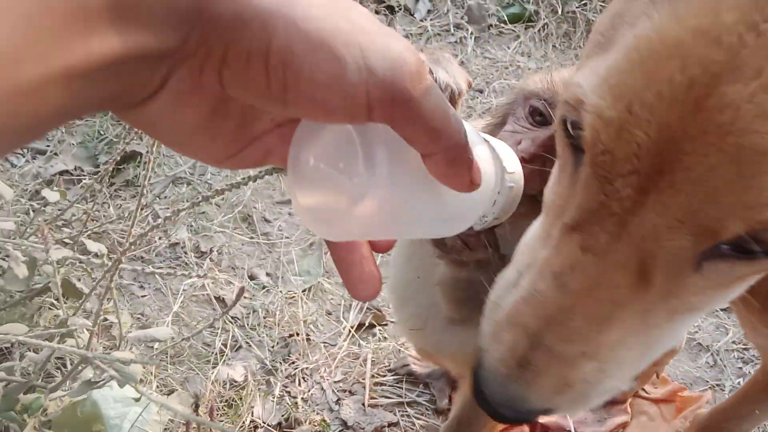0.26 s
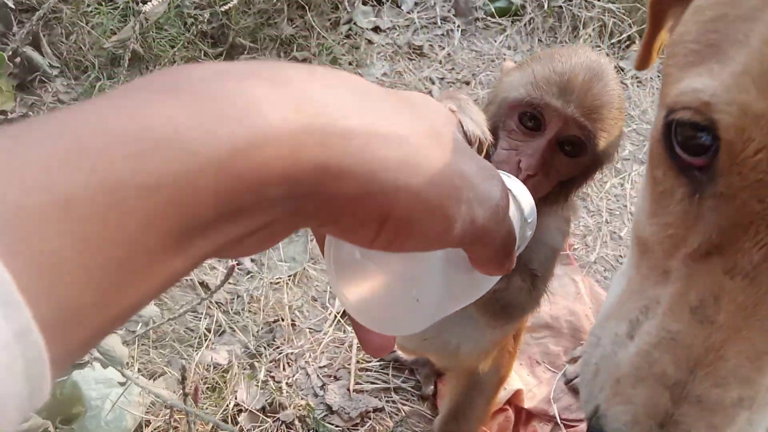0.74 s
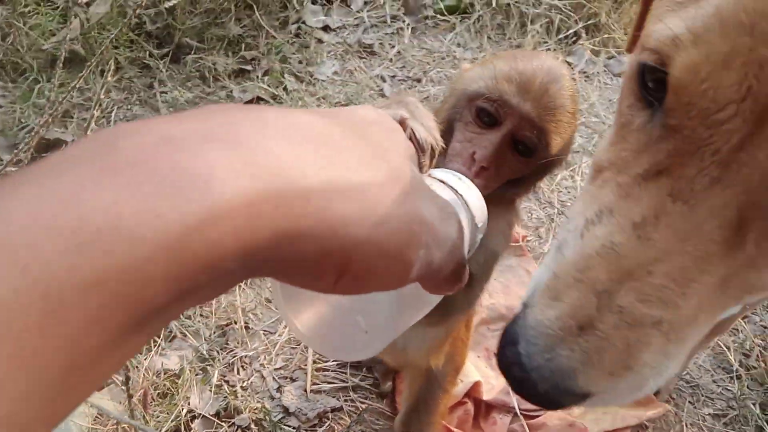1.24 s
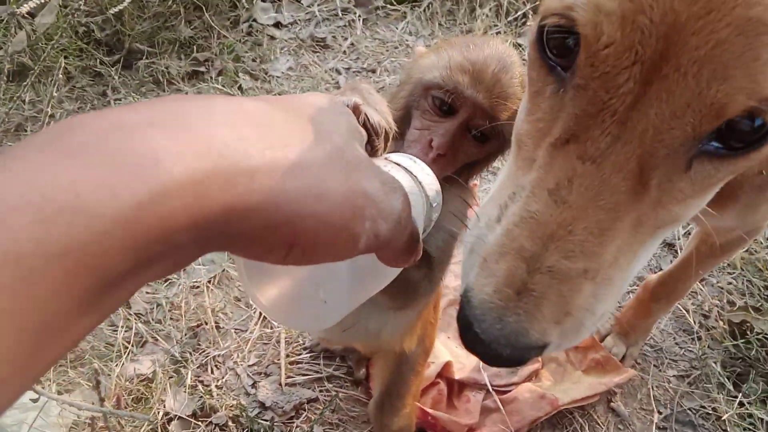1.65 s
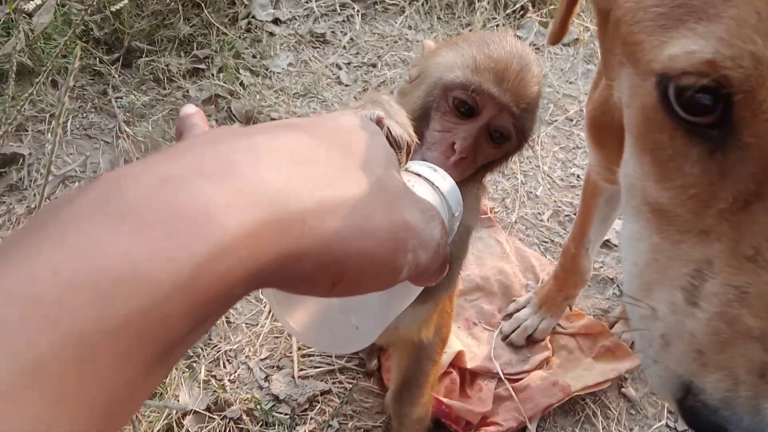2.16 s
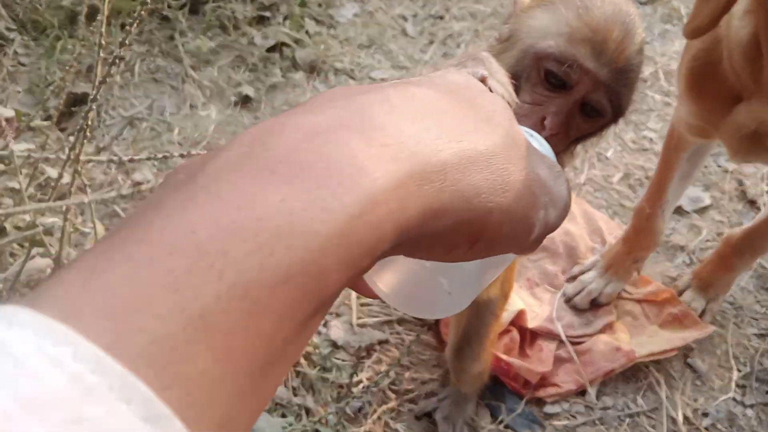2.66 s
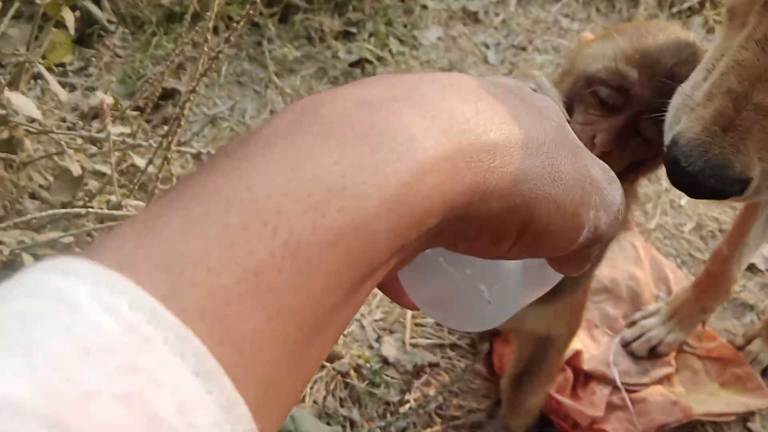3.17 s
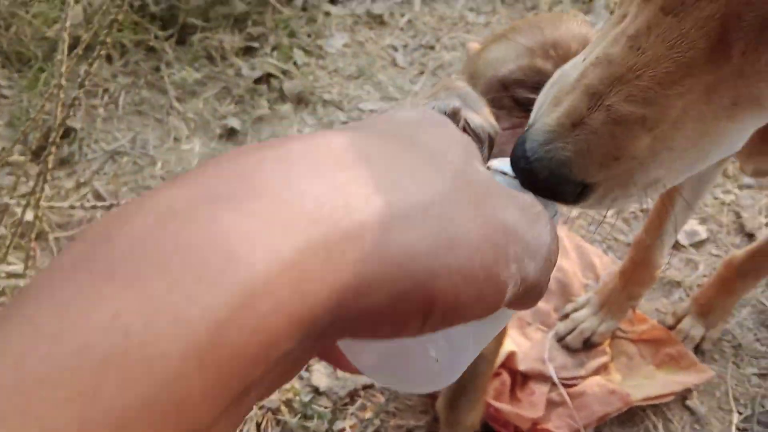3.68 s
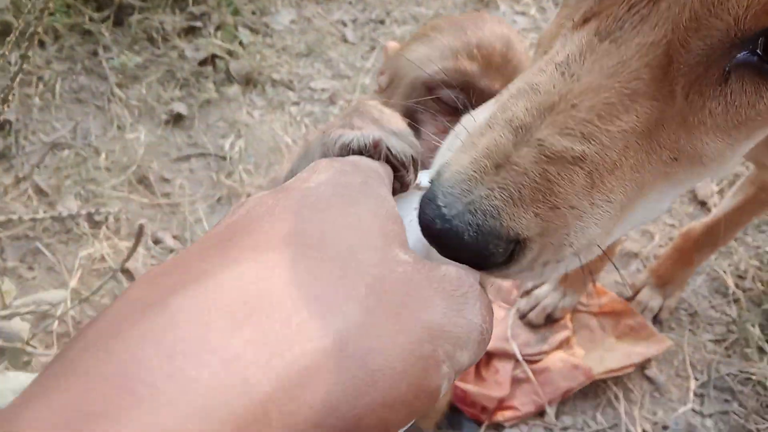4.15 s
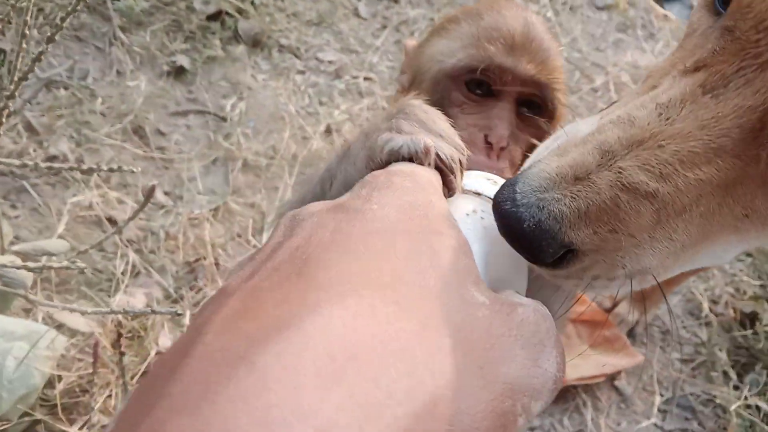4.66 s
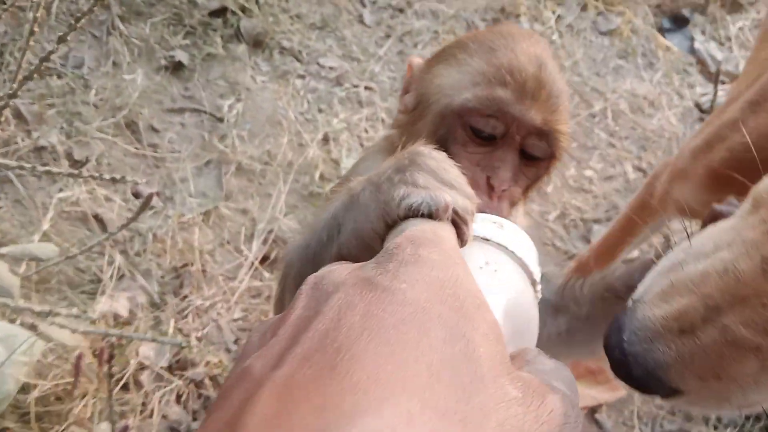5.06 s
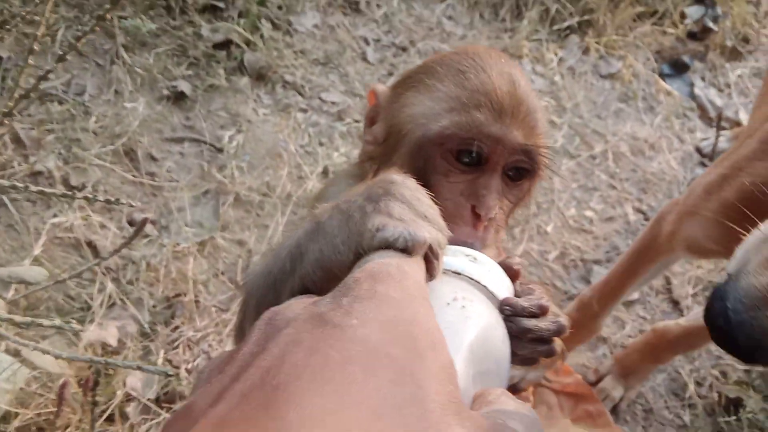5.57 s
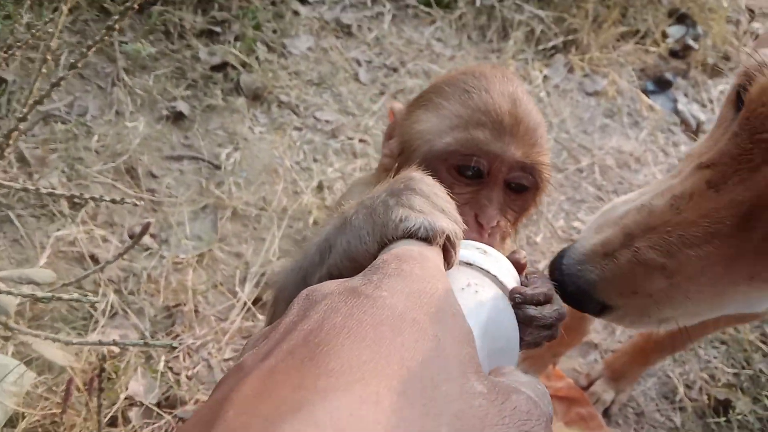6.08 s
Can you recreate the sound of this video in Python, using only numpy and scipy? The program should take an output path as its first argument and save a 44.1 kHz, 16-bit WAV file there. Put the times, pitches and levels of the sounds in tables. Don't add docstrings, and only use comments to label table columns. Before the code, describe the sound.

Busy bird flock in dry open country, mono and slightly thin as on a phone. Rough chirps lead, thinning briefly around a loud caw; clear whistles follow in the middle, then dense calls, a bright high whistle, a fast trill and closing caws. Behind them lie distant chatter, a wavering hoarse note and a low breeze. Small plastic knocks, dry ticks and faint leaf rustles sit close.

```python
import sys
import numpy as np
from scipy import signal
from scipy.fft import rfft, irfft, next_fast_len
from scipy.io import wavfile

SR = 44100
rng = np.random.default_rng(int(sys.argv[2]) if len(sys.argv) > 2 else 0)


def makeup_ratio(level_db):
    decades = np.asarray(level_db, float) / 20
    return 10 ** decades


def wrap_up_sound(samples):
    columns = np.atleast_2d(samples).T
    tamed = np.clip(columns, -1, 1)
    steps = np.round(tamed * 32767).astype(np.int16)
    wavfile.write(sys.argv[1], SR, steps)


N = 278698


def rms_one(x):
    return x / np.sqrt(np.mean(np.abs(x) ** 2) + 1e-20)


def add(out, start, x):
    out[start:start + len(x)] += x[:N - start]


def band(x, low_hz, high_hz, order=2):
    sos = signal.butter(order, [low_hz, high_hz], "band", fs=SR, output="sos")
    return signal.sosfilt(sos, x)


def drift(rate):
    knots_per_s = 40
    knots = rng.standard_normal(int(N / SR * knots_per_s) + 4)
    slow = rms_one(signal.lfilter([1], [1, -np.exp(-rate / 20)], knots))
    return np.interp(np.arange(N) / SR * knots_per_s, np.arange(len(slow)), slow)


def in_time(rows, fade_s=.009):
    s, *columns = np.transpose(rows)
    start = max(round(s[0] * SR), 0)
    t = np.arange(start, min(round(s[-1] * SR), N)) / SR
    fade_in = t - s[0] + (s[0] < .005)
    fade_out = s[-1] - t + (s[-1] > 6.3)
    gate = np.clip(np.minimum(fade_in, fade_out) / fade_s, 0, 1)
    return start, gate, [np.interp(t, s, c) for c in columns]


def call(s, length_s, from_hz, to_hz, db, peak, rise_db, fall_db):
    peak = np.clip(peak, .05, .95)
    peak_hz = from_hz + peak * (to_hz - from_hz)
    return in_time([(s, from_hz, db - rise_db, 0),
                    (s + peak * length_s, peak_hz, db, peak),
                    (s + length_s, to_hz, db - fall_db, 1)])


def syrinx(hz, partials, rasp_hz, rough, throb, wobble=0.0098, flutter=0):
    luck = rng.standard_normal((len(partials) + 1, 2, 600))
    knots, t = np.arange(600), np.arange(len(hz)) / SR
    uneven = np.interp(t * 150, knots, luck[-1, 0])
    waver = np.interp(t * 60, knots, luck[-1, 1])
    turns = np.cumsum(hz * (1 + wobble * waver)) / SR
    cycles = np.cumsum(rasp_hz * np.exp(0.22 * uneven)) / SR
    turns = turns + flutter * np.sin(2 * np.pi * cycles) / (2 * np.pi)
    pulse = 1 + np.clip(throb, 0, 1) * np.cos(2 * np.pi * cycles)
    out = 0
    for k, ((multiple, db), (a, b)) in enumerate(zip(partials, luck)):
        share = np.clip(rough + 0.22 * k, 0, 1)
        chance = np.interp(cycles * (1 + .2 * k), knots, a + 1j * b)
        chance = chance / (1 + .4 * np.abs(chance))
        steady_and_rough = np.sqrt(1 - share) + np.sqrt(share) * rms_one(chance)
        tone = rms_one(pulse * steady_and_rough)
        out = out + makeup_ratio(db) * np.sqrt(2) * np.real(tone * np.exp(2j * np.pi * multiple * turns))
    return out


# (pitch [Hz], level per Hz [dB])
AIR_COLOUR = [(25, -36), (62, 3), (120, 0), (330, -3.5), (520, -10), (1000, -7.5), (1800, -4.5),
              (3000, -10), (5000, -20.5), (7200, -19), (9000, -38), (13800, -34), (15000, -26.5),
              (15700, -22.5)]
# (time [s], level [dB])
BREEZE = [(0.0, -73), (0.54, -75), (1.21, -71), (1.71, -71), (1.92, -73), (2.38, -72), (2.76, -74),
          (4.43, -72), (5.61, -74), (5.76, -77), (6.09, -73), (6.32, -73)]


def air():
    size = next_fast_len(N)
    hz = np.fft.rfftfreq(size, 1 / SR) + 1
    colour_hz, colour_db = np.transpose(AIR_COLOUR)
    colour = makeup_ratio(np.interp(np.log(hz), np.log(colour_hz), colour_db))
    hush = rfft(rng.standard_normal(size)) * colour
    edges, gust = [0, *np.geomspace(60, 1100, 14), SR], drift(5)
    bands = [irfft(hush * ((hz > low) & (hz <= high)), size)[:N] for low, high in zip(edges, edges[1:])]
    lumpy = sum(b * makeup_ratio(4.7 * drift(18.4) + 1.6 * gust) for b in bands[:-1])
    breeze_db = np.interp(np.arange(N) / SR, *np.transpose(BREEZE))
    lumpy = lumpy * makeup_ratio(breeze_db - breeze_db.mean())
    smooth = bands[-1] * makeup_ratio(1.1 * gust)
    return makeup_ratio(-66.5) * rms_one(lumpy + smooth)


# (time [s], pitch [Hz], level [dB])
DRONE = [(0.0, 1263, -65.5), (0.49, 1273, -62.5), (0.53, 1263, -86), (0.7, 1233, -62.5),
         (1.49, 1254, -76.5), (1.74, 1298, -66.5), (2.11, 1269, -84), (2.18, 1296, -55.5),
         (2.48, 1275, -77), (3.61, 1238, -67), (3.62, 1259, -60.5), (4.96, 1291, -61.5),
         (5.09, 1267, -72.5), (6.14, 1250, -63), (6.32, 1248, -69)]
# (time [s], length [s], pitch [Hz], level [dB])
COOS = [
    (0.093, 0.62, 683, -75.5),
    (1.8, 0.44, 888, -73),
    (2.107, 0.72, 654, -76.5),
    (4.25, 1.02, 304.6, -75.5),
    (4.762, 0.21, 665, -77),
    (5.145, 0.2, 795, -71),
    (2.6, 0.19, 1064, -70),
    (3.75, 1.5, 1470, -69),
    (3.75, .08, 1650, -66),
]


def drone():
    out = np.zeros(N)
    _, _, (hz, db) = in_time(DRONE)
    white = rng.standard_normal((2, N))
    blur = signal.sosfilt(signal.butter(2, 40, fs=SR, output="sos"), white[0] + 1j * white[1])
    note = np.real(blur[:len(hz)] * np.exp(2j * np.pi * np.cumsum(hz) / SR))
    add(out, 0, makeup_ratio(db) * rms_one(note))
    for s, length_s, hz, db in COOS:
        swell = np.sqrt(np.hanning(round(length_s * SR)))
        coo = syrinx(hz + 0 * swell, [(1, db)], rasp_hz=25, rough=1.0, throb=0)
        add(out, round(s * SR), swell * coo)
    return out


# (time [s], chatter level [dB], lean to the high voices [dB per octave])
FLOCK = [(0.0, -67.5, 0), (.4, -63, -1.5), (.58, -53.5, 2), (.9, -65.5, -3), (1.1, -53.5, -4.5),
         (1.41, -72.5, 8.5), (2.159, -76.5, -2.5), (2.5, -83, 3.5), (2.801, -65, 10.5), (3.3, -69.5, -5),
         (3.48, -72.5, -2.5), (3.7, -71.5, -5), (4.12, -64.5, -2), (4.5, -64.5, 5), (4.66, -69, -10.5),
         (5.25, -64, -3), (5.77, -55, -2), (6.09, -63, 0.5)]
# (pitch [Hz], level [dB])
FLOCK_TILT = [(1500, -7), (2000, -0.5), (3000, 7.5), (4500, 2.5), (6200, -0.5), (7300, -3.5), (8500, -6.5),
              (11000, -13.5)]
# (time [s], length [s], middle pitch [Hz], peak level [dB])
SURGES = [(0.018, 0.37, 4030, -50), (.631, 0.083, 5510, -63), (.741, 0.078, 3350, -50),
          (1.101, 0.23, 3330, -64), (1.847, 0.22, 4200, -61), (2.966, 0.37, 3880, -49.5),
          (4.953, 0.33, 3700, -57), (5.36, 0.43, 3830, -51.5), (5.851, 0.37, 3810, -54.5),
          (6.284, 0.25, 4280, -51.5), (1.4, .3, 5600, -68), (2.79, .12, 5600, -60), (1.411, .31, 7800, -78),
          (2.94, 0.29, 7710, -69), (4.101, .21, 7710, -80), (5.491, .26, 7710, -74),
          (6.251, 0.45, 7710, -60)]


def far_flock():
    middle_hz, top_hz, above_db_per_oct = 3700, 5764, -57
    surge_octaves = .35
    t = np.arange(0, N / SR + .01, .005)
    s, chatter_db, lean_db = np.transpose(FLOCK)
    chatter_db, lean_db = np.interp(t, s, chatter_db), np.interp(t, s, lean_db)
    out, white = np.zeros(N), rng.standard_normal((2, N))
    edges = np.geomspace(1450, 11000, 46)
    for k, (low_hz, high_hz) in enumerate(zip(edges, edges[1:])):
        octaves = np.log2(np.clip(low_hz, 2400, top_hz) / middle_hz)
        above_db = above_db_per_oct * max(np.log2(low_hz / top_hz), 0)
        power = makeup_ratio(chatter_db + lean_db * octaves + above_db) ** 2
        for s, length_s, hz, db in SURGES:
            off_pitch_db = 10 * abs(np.log2(low_hz / hz)) / surge_octaves
            power = power + makeup_ratio(db - 33 * ((t - s) / length_s) ** 2 - off_pitch_db) ** 2
        tilt_db = np.interp(low_hz, *np.transpose(FLOCK_TILT)) - 12.0
        gain = np.interp(np.arange(N) / SR, t, np.sqrt(power)) * makeup_ratio(tilt_db)
        voice = rms_one(band(white[k % 2], low_hz, high_hz))
        out += gain * voice * makeup_ratio(4.0 * drift(17) - 1.5)
    return out


# (time [s], length [s], peak level [dB])
RUSTLES = [
    (.43, .03, -84),
    (1.3, .1, -88),
    (1.44, .12, -86),
    (1.71, .05, -82),
    (2.28, .04, -84),
    (2.94, .05, -82),
    (4.09, .05, -83),
    (5.52, .15, -86),
]


def leaves():
    t = np.arange(N) / SR
    swell = sum(makeup_ratio(db - 33 * ((t - s) / length_s) ** 2) for s, length_s, db in RUSTLES)
    return swell * rms_one(band(rng.standard_normal(N), 8600, 15700))


# (time [s], peak level [dB], pitch [Hz], time to die by 60 dB [s], duller body re peak [dB])
TICKS = [(0.2029, -98, 7600, 0.018, 27), (0.317, -54.5, 7900, 0.028, -6), (0.4215, -70, 8600, 0.018, 12),
         (1.126, -69, 7600, 0.02, 9), (1.3653, -64, 7590, 0.015, -6), (1.816, -76, 7590, 0.02, 4),
         (1.9036, -79, 7650, 0.02, 6), (2.184, -69, 7610, 0.02, 8), (2.2796, -70, 7740, 0.017, 8),
         (2.7335, -74, 7400, 0.017, 15), (2.7538, -75, 7400, 0.017, 10), (2.8536, -62.5, 7750, 0.025, -4),
         (2.9349, -62, 8770, 0.019, -5), (3.0696, -95, 8130, 0.017, 19), (3.942, -60, 9100, 0.0076, -9),
         (4.0794, -69, 7700, 0.017, 8), (4.5463, -50, 10900, 0.028, -17), (5.5123, -53.5, 7490, 0.019, -1)]


def grass_ticks():
    out, t = np.zeros(N), np.arange(SR // 12) / SR
    for s, db, hz, t60, body_db in TICKS:
        burst = rng.standard_normal(len(t)) * makeup_ratio(-60 * t / t60)
        bright = band(burst, 0.83 * hz, min(1.13 * hz, 16000)) + .35 * band(burst, 14000, 15800)
        body = band(burst, 2500, 11000)
        tick = bright / abs(bright).max() + makeup_ratio(body_db) * body / abs(body).max()
        add(out, round(s * SR), makeup_ratio(db) * tick)
    return out


# (time [s], peak level [dB], pitch [Hz], time to die by 60 dB [s])
KNOCKS = [(0.067, -44.5, 1060, 0.016), (.88, -59, 443, 0.029), (0.97, -50.5, 464, 0.052),
          (1.137, -52.5, 1050, 0.049), (2.198, -43, 1140, 0.018), (2.221, -56, 316, 0.046),
          (2.755, -49.5, 210, 0.024), (3.325, -55, 801, 0.045), (3.85, -64, 815, 0.21),
          (3.978, -42.5, 850, 0.026), (4.344, -51, 380, 0.048), (4.515, -41.5, 1110, 0.027),
          (4.787, -53, 420, 0.028), (5.511, -47.5, 810, 0.0086), (5.69, -47.5, 1100, 0.043)]


def bottle_knocks():
    out, t = np.zeros(N), np.arange(SR // 12) / SR
    for s, db, hz, t60 in KNOCKS:
        attack = np.minimum(t / 0.00085, 1)
        add(out, round(s * SR), makeup_ratio(db - 60 * t / t60) * attack * np.sin(2 * np.pi * hz * t))
    return out


# (time [s], pitch [Hz], level [dB])
FLAT_WHISTLE = [
    (2.775, 2865, -63),
    (2.789, 2894, -47.5),
    (3.005, 2936, -51.5),
    (3.02, 2950, -49),
]
# (time [s], pitch [Hz], level [dB])
FALLING_WHISTLE = [
    (3.415, 2600, -54),
    (3.445, 2480, -45),
    (3.48, 2320, -42),
    (3.515, 2280, -43),
    (3.53, 2270, -54),
]
# (time [s], pitch [Hz], level [dB])
LONG_WHISTLE = [
    (3.735, 3686, -62),
    (3.771, 3407, -53.5),
    (3.825, 2954, -47.5),
    (3.913, 2946, -46.5),
    (4.01, 2894, -52),
]
# (time [s], pitch [Hz], level [dB])
HIGH_WHISTLE = [
    (4.855, 3424, -42),
    (4.87, 3538, -42.5),
    (4.895, 3530, -38),
    (4.94, 3390, -47),
    (5.0, 3440, -48.5),
    (5.1, 3520, -54),
    (5.22, 3440, -57),
]
# (time [s], mean pitch [Hz], level [dB], pitch swing [Hz])
TRILL = [
    (5.635, 3250, -60, 250),
    (5.65, 3250, -47, 280),
    (5.7, 3330, -45.5, 230),
    (5.74, 3450, -43, 130),
    (5.775, 3330, -44.5, 130),
    (5.79, 3150, -60, 150),
]


def whistles():
    out = np.zeros(N)
    birds = [(FLAT_WHISTLE, -30, -25, .05), (FALLING_WHISTLE, -40, -30, .12),
             (LONG_WHISTLE, -21, -19, .45), (HIGH_WHISTLE, -34, -25, .4)]
    for rows, third_db, fourth_db, rough in birds:
        start, gate, (hz, db) = in_time(rows)
        open_db = db - 0.05 * (hz - np.median(hz)).clip(0)
        partials = [(2, db), (3, open_db + third_db), (4, open_db + fourth_db)]
        tone = syrinx(hz / 2, partials, rasp_hz=119.9, rough=rough, throb=0.32, wobble=0.012 * rough)
        add(out, start, gate * tone)
    return out


def trill():
    out, trill_hz = np.zeros(N), 67.3
    start, gate, (hz, db, swing_hz) = in_time(TRILL)
    beat = np.cos(2 * np.pi * trill_hz * (np.arange(len(hz)) / SR - .013))
    db = db + 3 * beat
    partials = [(2, db), (3, db - 11)]
    tone = syrinx((hz - swing_hz * beat) / 2, partials, rasp_hz=200, rough=.25, throb=.1, wobble=.008)
    add(out, start, gate * tone)
    return out


# (time [s], length [s], pitch [Hz], peak level [dB], loudest at [share of length])
CHIRPS = [(2.078, .11, 3670, -58.5, .9), (3.27, 0.027, 3660, -55.5, 0.43), (3.339, 0.26, 3710, -56.5, 0.38),
          (3.585, 0.2, 3800, -66.5, 0.68), (4.593, 0.13, 3820, -55, .5), (4.7, 0.073, 3600, -57, .5),
          (6.165, .055, 3750, -49, 0.5), (3.335, 0.039, 2483, -51.5, 0.68), (3.857, .03, 2330, -43, .4),
          (3.912, .03, 2325, -48, 0.23), (5.79, 0.04, 2680, -44.5, 0.4)]


def chirps():
    out = np.zeros(N)
    for s, length_s, hz, db, peak in CHIRPS:
        start, gate, (hz, db, _) = call(s, length_s, hz, hz, db, peak, rise_db=4.5, fall_db=11)
        add(out, start, gate * syrinx(hz, [(1, db)], rasp_hz=170, rough=.7, throb=.3))
    return out


# (time [s], length [s], from [Hz], to [Hz], peak level [dB])
FADING_SLIDES = [(2.334, .045, 3600, 3560, -49), (.675, .09, 1620, 1580, -55),
                 (4.494, 0.078, 2580, 2060, -39), (4.495, .065, 3100, 2660, -42),
                 (3.56, .21, 2490, 2520, -59), (4.005, .15, 2890, 2860, -55), (1.825, .1, 2400, 2300, -60),
                 (1.96, .07, 2300, 2300, -60), (2.485, .14, 2260, 2220, -58), (3.525, .06, 2400, 2350, -54),
                 (.085, .07, 2450, 2400, -54)]
# (time [s], length [s], from [Hz], to [Hz], peak level [dB])
ARCHED_SLIDES = [(.416, .044, 2690, 2610, -49), (.456, .112, 4120, 3660, -48), (.69, .06, 2100, 2500, -47),
                 (1.065, .08, 2220, 2150, -48), (2.385, .085, 3340, 3180, -57), (.11, .19, 2110, 2060, -60),
                 (4.725, .125, 2310, 2360, -48), (5.305, .06, 2250, 2560, -47),
                 (5.355, .1, 2560, 2450, -46.5), (.59, .1, 2900, 2800, -45), (4.15, .06, 2250, 2550, -52),
                 (4.56, .07, 2200, 2350, -53), (4.385, .085, 2750, 2350, -47), (.33, .075, 2150, 2120, -59),
                 (3.475, .13, 4650, 4550, -64), (3.42, .03, 3550, 3450, -56)]
# (time [s], length [s], from [Hz], to [Hz], peak level [dB])
SWELLING_SLIDES = [
    (3.928, 0.045, 2880, 2520, -47),
    (3.416, 0.026, 2750, 2550, -46.5),
    (4.901, .135, 2530, 2340, -53.5),
    (4.365, .105, 2400, 2420, -49.5),
    (2.44, 0.0445, 2560, 2120, -44),
]
# (loudest at [share of length], start under the peak [dB], end under the peak [dB])
FADING, ARCHED, SWELLING = (.18, 6, 15), (.4, 7.5, 8), (.7, 8, 3)


def slides():
    out = np.zeros(N)
    for rows, shape in [(FADING_SLIDES, FADING), (ARCHED_SLIDES, ARCHED), (SWELLING_SLIDES, SWELLING)]:
        for row in rows:
            start, gate, (hz, db, _) = call(*row, *shape)
            add(out, start, gate * syrinx(hz, [(1, db)], rasp_hz=170, rough=.55, throb=.3, wobble=.014))
    return out


# (time [s], length [s], from [Hz], to [Hz], peak level [dB])
CRIES = [(0.0, 0.078, 6250, 6100, -55.5), (5.647, .14, 4060, 4050, -51), (5.44, .13, 4000, 3950, -55),
         (5.65, .1, 1900, 2300, -55), (0.0, .075, 3950, 3850, -42), (.06, .24, 3900, 3850, -55),
         (0.0, .09, 3000, 2900, -52), (4.965, .1, 4300, 4200, -55), (2.189, 0.12, 1599, 1540, -56.5),
         (2.335, 0.053, 2595, 2500, -46), (2.384, 0.078, 2590, 2557, -47), (5.85, .055, 2050, 2380, -48),
         (5.885, .11, 2380, 2420, -44), (0.58, 0.1, 5450, 5440, -53), (.56, .11, 6150, 6150, -57),
         (0.401, 0.04, 4300, 4990, -50.5), (0.854, 0.11, 5340, 4930, -57.5), (1.06, 0.08, 5280, 5330, -51),
         (3.3, 0.2, 5950, 5600, -68), (4.203, 0.17, 5340, 5410, -55), (4.283, 0.069, 5680, 6640, -53.5),
         (4.338, 0.094, 5440, 5180, -58.5), (4.723, 0.1, 6240, 6080, -60), (4.96, 0.035, 4600, 3750, -46.5),
         (4.988, 0.069, 4120, 4270, -51.5), (5.32, 0.06, 4950, 5050, -54), (6.165, 0.027, 1700, 2800, -46)]
# (time [s], length [s], from [Hz], to [Hz], peak level [dB])
MORE_CRIES = [(.72, .055, 3100, 3850, -49), (.5, .075, 3850, 3800, -50), (2.675, .04, 4650, 4700, -62),
              (2.585, .05, 5500, 5550, -65), (4.73, .12, 5250, 5000, -59), (2.255, .06, 4450, 4500, -58),
              (2.2, .11, 5450, 5600, -59), (1.6, .035, 3600, 3500, -58), (1.805, .03, 3250, 3150, -51),
              (1.83, .12, 4550, 4450, -61), (2.36, .095, 3500, 3250, -54), (6.145, .04, 4200, 4100, -52),
              (1.7, .085, 3600, 3500, -47), (1.7, .065, 5900, 5750, -52), (.925, .04, 6200, 6250, -57),
              (.96, .07, 3250, 3250, -54), (0.0, .1, 5100, 4900, -54), (4.44, .09, 5300, 5150, -60)]


def cries():
    out = np.zeros(N)
    for row in CRIES + MORE_CRIES:
        start, gate, (hz, db, _) = call(*row, *ARCHED)
        add(out, start, gate * syrinx(hz, [(1, db)], rasp_hz=380, rough=.9, throb=.4, wobble=.015))
    return out


# (time [s], length [s], second partial [Hz], peak level [dB], sag [share of pitch])
CAWS = [
    (1.693, 0.125, 2540, -39.5, 0.05),
    (2.178, 0.13, 2618, -45, 0.026),
    (2.735, .15, 2280, -41.5, -0.09),
    (6.17, 0.035, 2600, -43, 0.03),
    (6.215, .1, 2560, -45.5, .02),
]


def caws():
    out = np.zeros(N)
    for s, length_s, hz, db, sag in CAWS:
        start, gate, (hz, db, done) = call(s, length_s, hz, hz * (1 - sag), db, peak=.6, rise_db=6.5, fall_db=5)
        top_db = db - 13 - 11 * done
        partials = [(2, db), (2.8, db - 8), (1.2, db - 21.5), (1.55, db - 17), (1.55, db - 17),
                    (3.75, top_db - 1), (4.7, top_db), (5.7, top_db - 15)]
        caw = syrinx(hz / 2, partials, rasp_hz=340, rough=.6, throb=.3, wobble=.03, flutter=.25)
        add(out, start, gate * caw)
    return out


# (time [s], length [s], pitch [Hz], peak level [dB], loudest at [share of length])
RASPS = [ (0.0, 0.092, 2428, -41.5, 0.55), (.57, .125, 2780, -45, 0.65), (.7, 0.075, 2650, -46, 0.48),
         (.785, 0.045, 2800, -43.5, 0.53), (.834, 0.097, 2850, -37, 0.3), (1.0, 0.035, 2910, -53, 0.67),
         (1.06, 0.09, 3200, -49, 0.6), (1.146, 0.073, 2720, -39.5, .15), (1.377, 0.03, 2700, -49, 0.4),
         (2.144, 0.062, 2506, -54, 0.6), (1.23, .07, 2700, -54, .3), (1.405, .04, 2400, -58, .3),
         (4.18, 0.115, 2650, -43, 0.55), (4.357, 0.11, 2680, -41, 0.12), (4.755, 0.05, 2850, -47, 0.5),
         (4.805, 0.055, 2800, -44, 0.2), (4.895, .14, 2950, -44.5, 0.49)]


def rasps():
    out, sag = np.zeros(N), .1
    for s, length_s, hz, db, peak in RASPS:
        from_hz, to_hz = hz * (1 + sag / 2), hz * (1 - sag / 2)
        start, gate, (hz, db, _) = call(s, length_s, from_hz, to_hz, db, peak, rise_db=6, fall_db=10)
        rasp = syrinx(hz, [(1, db)], rasp_hz=420, rough=.45, throb=.3, wobble=.03, flutter=1.0)
        rasp = band(rasp, .73 * hz.mean(), 1.27 * hz.mean(), order=4)
        octave_db = -64 + .33 * (db + 42.5)
        octave = syrinx(hz, [(1.95, octave_db)], rasp_hz=420, rough=.8, throb=.3, wobble=.03)
        add(out, start, gate * (rasp + octave))
    return out


def scrub(x):
    t60_s, tail_db = 0.45, -14
    t = np.arange(SR) / SR
    tail = band(rng.standard_normal(SR), 900, 4200, order=1) * makeup_ratio(-60 * t / t60_s) * (t > .008)
    return x + makeup_ratio(tail_db) * signal.fftconvolve(x, tail / np.sqrt(np.sum(tail ** 2)))[:N]


def scene():
    background = air() + drone() + far_flock()
    close_by = leaves() + grass_ticks() + bottle_knocks()
    near_birds = whistles() + trill() + chirps() + slides() + cries() + caws() + rasps()
    return (background + close_by + scrub(near_birds))[None]


def roll_off(x):
    return signal.sosfilt(signal.butter(12, 16860, fs=SR, output="sos"), x)


def record(dry):
    notch_hz, width_hz, depth, cutoff_hz = 6620, 350, .75, 15700
    x = dry - depth * signal.lfilter(*signal.iirpeak(notch_hz, notch_hz / width_hz, fs=SR), dry)
    x = signal.sosfilt(signal.ellip(12, .5, 70, cutoff_hz, fs=SR, output="sos"), x)
    return roll_off(x)


dry = scene()
out = record(dry)
wrap_up_sound(out)
```